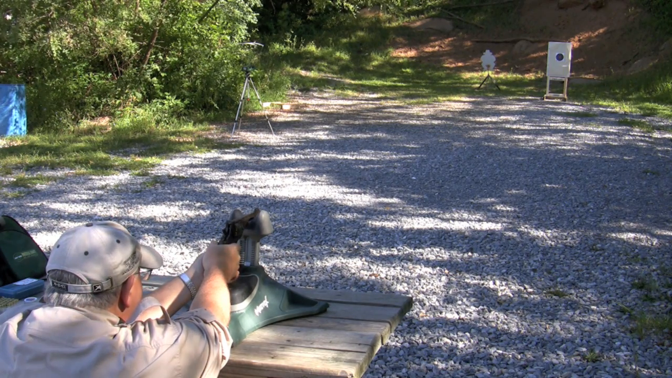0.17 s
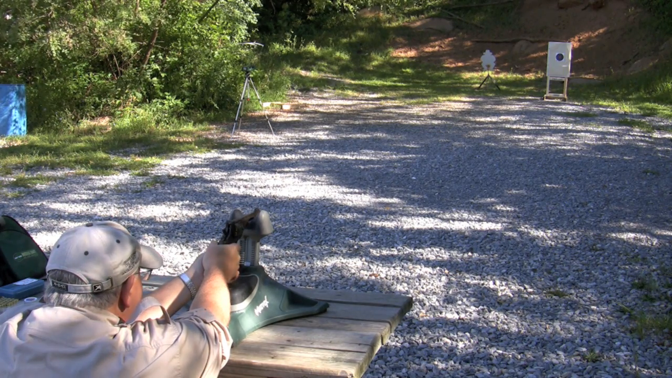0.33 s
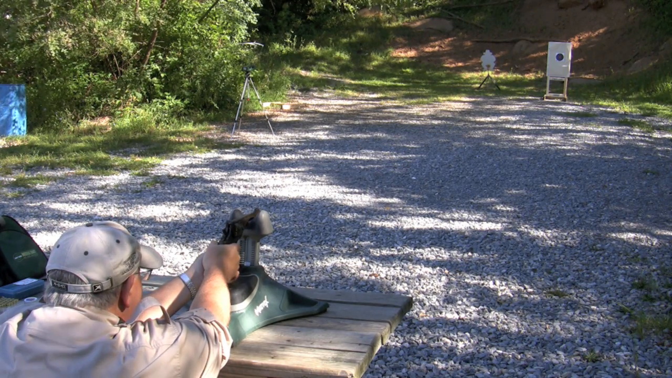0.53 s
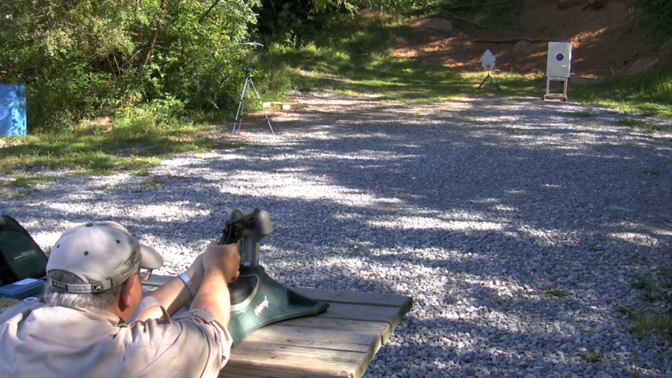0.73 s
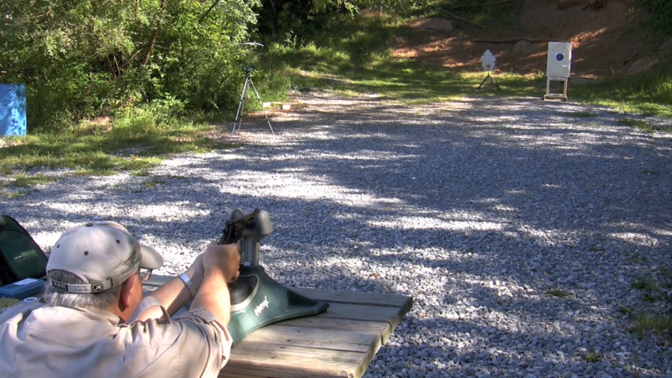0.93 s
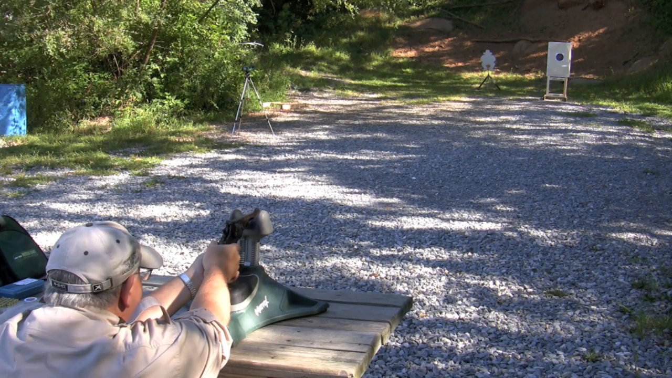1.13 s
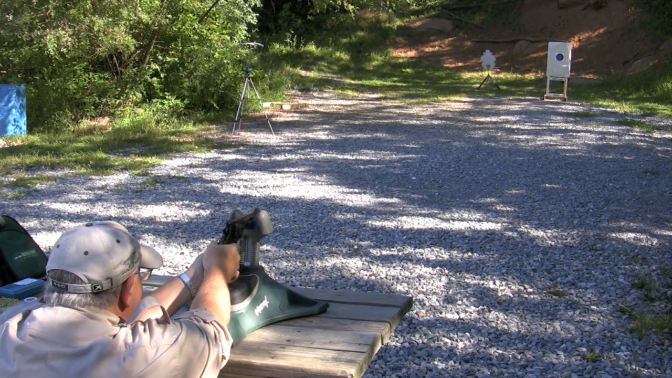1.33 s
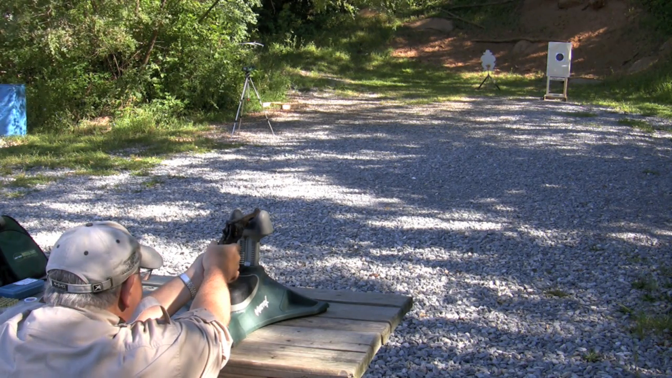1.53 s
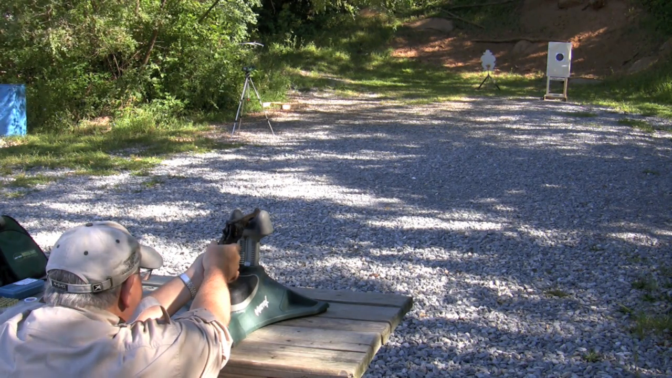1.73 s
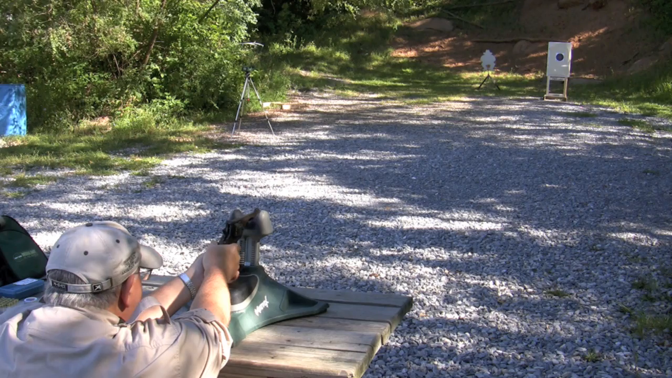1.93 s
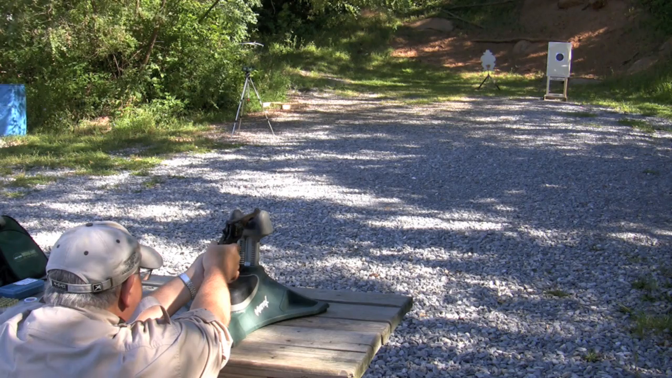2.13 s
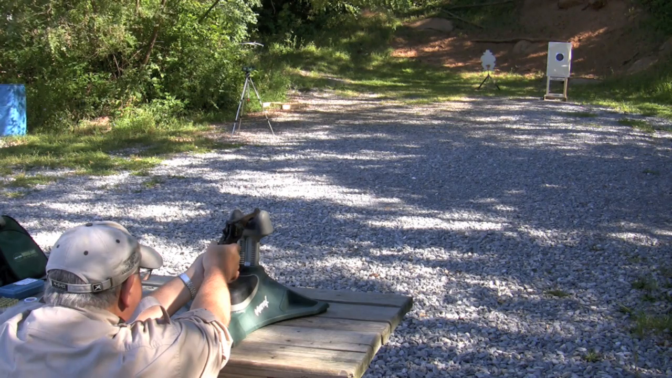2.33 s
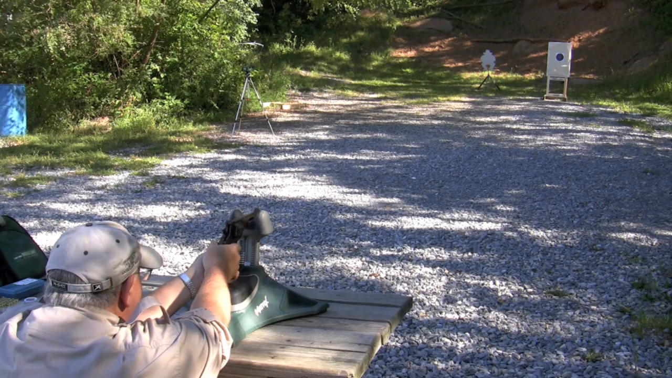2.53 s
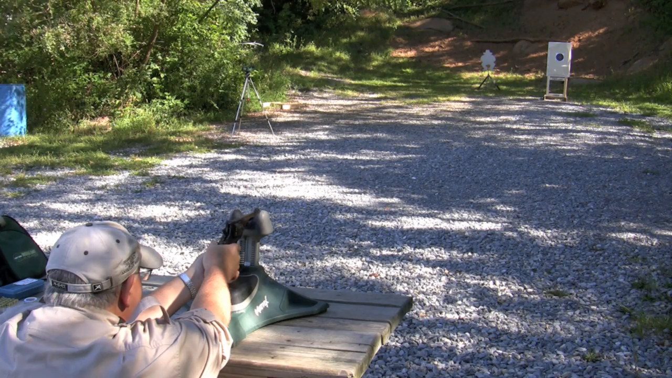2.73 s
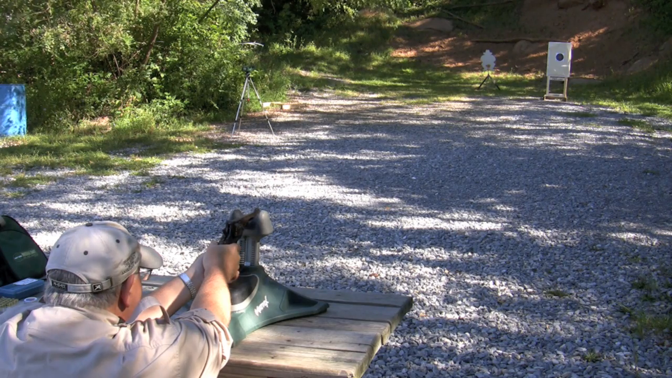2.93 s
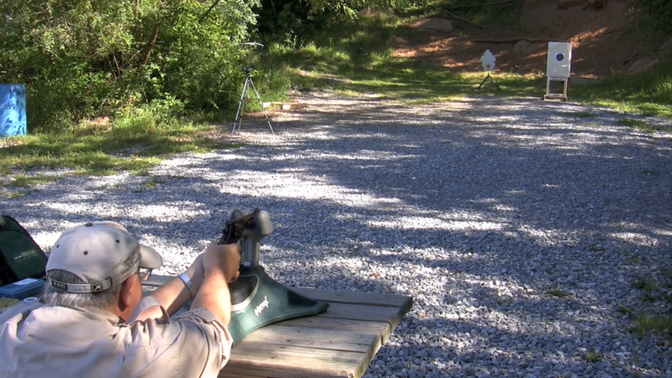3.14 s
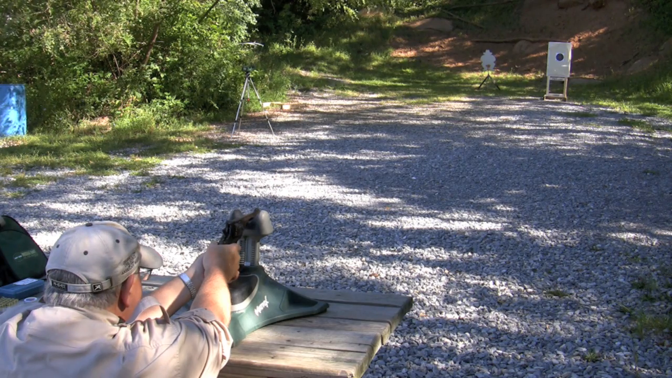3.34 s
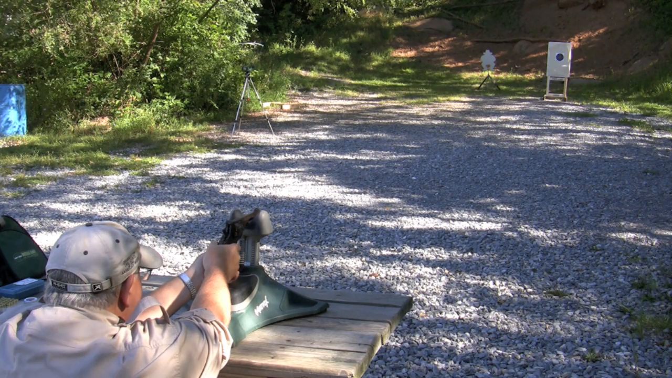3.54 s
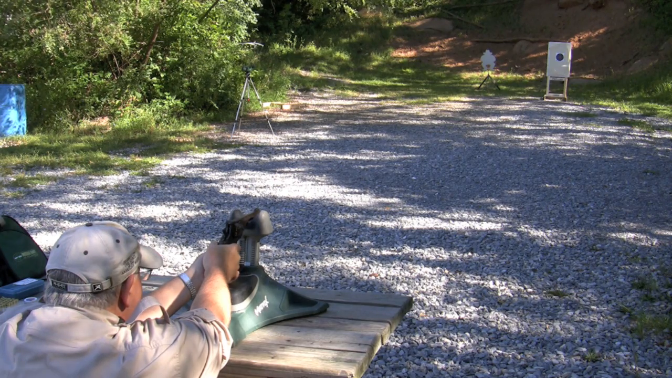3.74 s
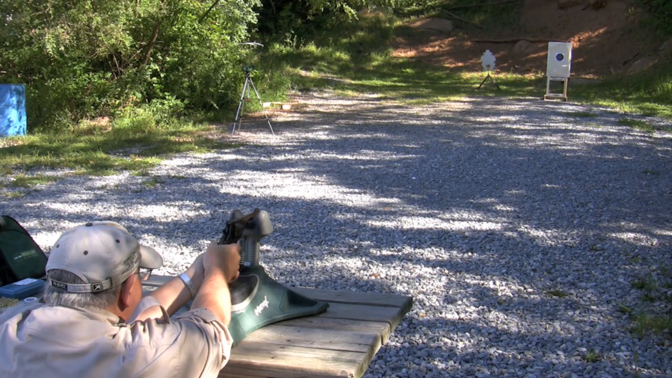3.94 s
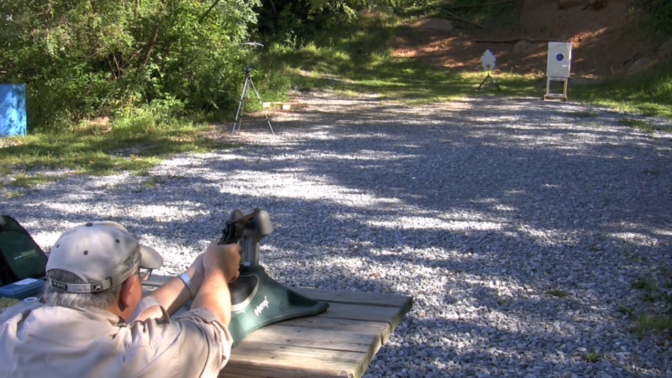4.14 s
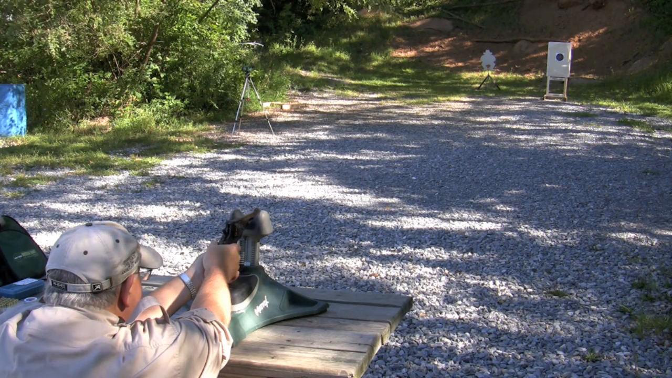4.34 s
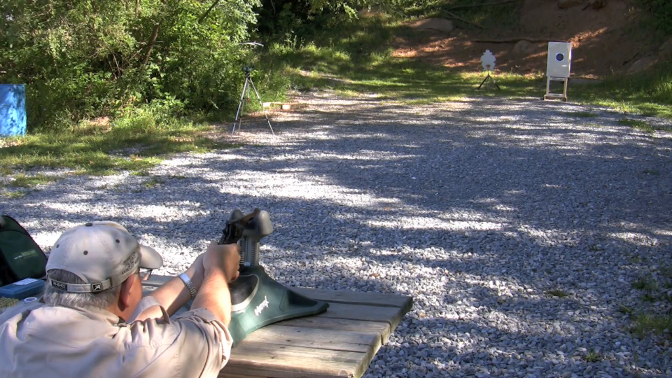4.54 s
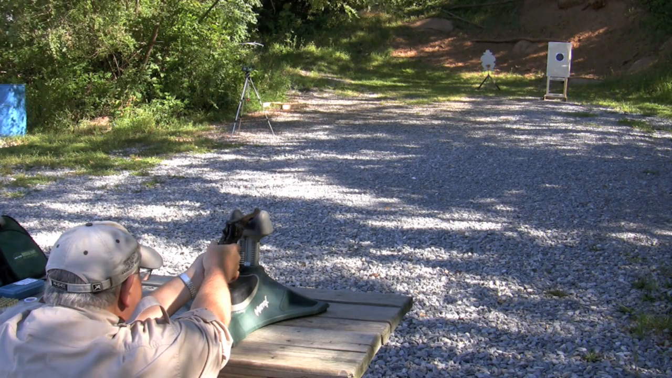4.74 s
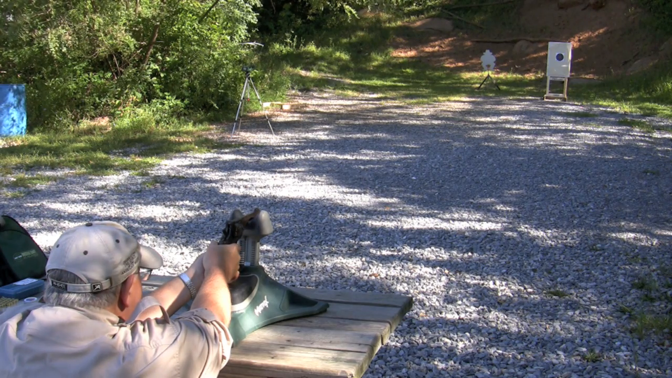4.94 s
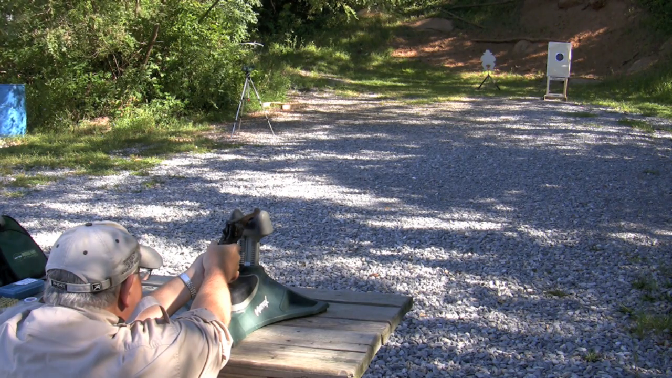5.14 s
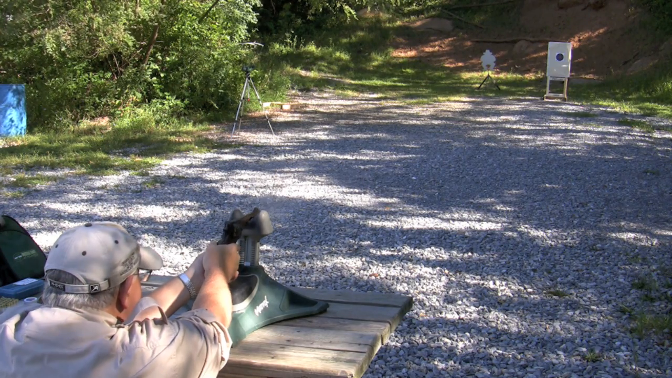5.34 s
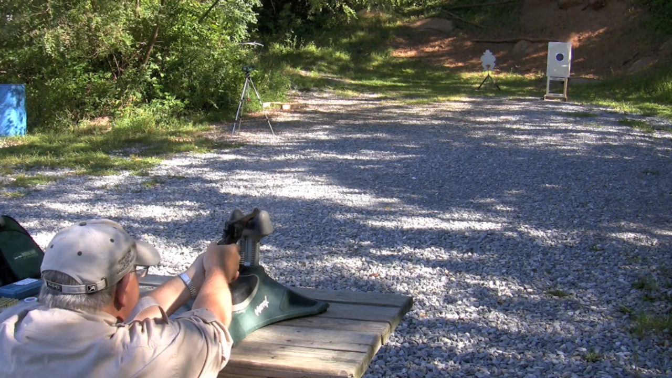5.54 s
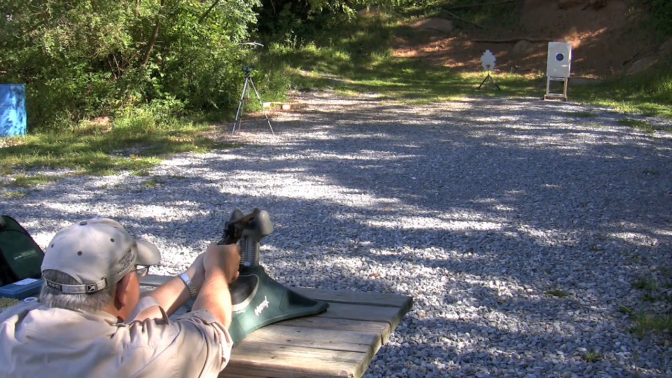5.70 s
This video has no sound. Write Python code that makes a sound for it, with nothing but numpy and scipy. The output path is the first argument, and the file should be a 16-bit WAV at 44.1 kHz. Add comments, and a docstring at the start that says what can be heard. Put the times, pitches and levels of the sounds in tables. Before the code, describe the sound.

Over five seconds of quiet summer crickets and bird trills, then a sudden clipped revolver blast, knocking echoes, and insects again.

```python
"""One revolver shot from a bench at a gravel range ringed by woods: pulses of shaped noise that clip the input.
Ringing knocks, noise washes and dull rolls return from gravel, bushes, earth banks and trees; brief noise
bursts make the hammer and settling ticks. Before and beneath it is a summer day: swept sine notes for a small
bird, pulsed sines for crickets, and bands of noise for the insect chorus, buzzers, traffic and a vehicle."""
import sys
import numpy as np
from scipy import signal
from scipy.fft import rfft, irfft
from scipy.io import wavfile

SR = 44100
rng = np.random.default_rng(int(sys.argv[2]) if len(sys.argv) > 2 else 0)


def to_wav(s):
    """Save 16-bit WAV."""
    ch = np.atleast_2d(s).T  # columns
    pcm = np.round(np.clip(ch, -1, 1) * 32767)  # PCM
    wavfile.write(sys.argv[1], SR, pcm.astype(np.int16))


N = 258867
TIME = np.arange(N) / SR
SHOT_S = 5.3364  # the blast arrives

# left-right likeness of the calm background: (frequency [Hz], likeness [0-1])
CALM_SAME = [(60, 0.8226), (290, 1), (640, 0.59), (1410, 0.2793), (3100, 0.6619), (6800, 0.7797),
             (15000, 1)]
# left-right likeness of the shot's returns: (frequency [Hz], likeness [0-1])
ECHO_SAME = [(60, 0.696), (200, 0.9539), (400, 0.93), (700, 0.75), (1400, 0.76), (2400, 0.6456),
             (4400, 0.891), (9000, 1)]


def gain_of(db):
    """Decibels to amplitude gain."""
    return 10 ** (np.asarray(db) / 20)


def evened(x):
    """Scales to rms 1."""
    return x / np.sqrt(np.mean(x ** 2) + 1e-20)


def decay(t, t60_s):
    """Exponential decay, 60 dB down after t60_s."""
    return np.exp(-np.log(1000) * t / t60_s)


def read(points, hz):
    """Reads a spectrum table on a log-frequency axis."""
    f, value = np.transpose(points)
    return np.interp(np.log(hz + 1), np.log(f + 1), value)


def add(mix, s, sound):
    """Mixes a sound in at time s, cut at the end of the mix."""
    part = mix[..., round(s * SR):][..., :sound.shape[-1]]
    part += sound[..., :part.shape[-1]]


def panned(pan_db):
    """Left and right gains for a left-minus-right level."""
    return gain_of([[pan_db / 2], [-pan_db / 2]])


def drift(rate_hz):
    """Random drift of rms 1: white noise cut off at rate_hz."""
    spectrum = rfft(rng.standard_normal(N))
    return evened(irfft(spectrum * (np.fft.rfftfreq(N, 1 / SR) < rate_hz), N))


def noise(colour_db, same):
    """Stereo noise of rms 1; colour_db maps Hz to dB, mid and side weights set the channels' likeness."""
    hz = np.fft.rfftfreq(N, 1 / SR)
    mid, side = rfft(rng.standard_normal((2, N))) * gain_of(colour_db(hz))
    likeness = np.clip(read(same, hz), 0, .999)
    mid = mid * np.sqrt(1 + likeness)
    side = side * np.sqrt(1 - likeness)
    return evened(irfft(np.array([mid + side, mid - side]), N))


def shaped(spectrum, same):
    """Stereo noise of rms 1 with a tabled spectrum."""
    return noise(lambda hz: read(spectrum, hz), same)


def beat(period_s, at_s, width_s):
    """A Gaussian swell once every period, width_s wide at -4.3 dB."""
    from_call_s = (TIME - at_s + period_s / 2) % period_s - period_s / 2
    return np.exp(-2 * (from_call_s / width_s) ** 2)


def whistle(pitch_hz, db):
    """One note along a pitch curve under a half-sine envelope."""
    envelope = np.sin(np.linspace(0, np.pi, len(pitch_hz)))
    return gain_of(db) * np.sqrt(2) * envelope * np.sin(2 * np.pi * np.cumsum(pitch_hz) / SR)


def foliage(song, wet_db, t60_s):
    """Adds the faint wash that leaves give a call: convolution with decaying stereo noise."""
    leaves = rng.standard_normal((2, SR // 2)) * decay(TIME[:SR // 2], t60_s)
    leaves = leaves / np.linalg.norm(leaves[0])
    wash = signal.fftconvolve(song[None], leaves, axes=1)[:, :N]
    return song + gain_of(wet_db) * wash


def background(air_db=-57.5, chorus_db=-42, rasp_db=-0.15, throb_db=.5, pan_db=0.36):
    """Far traffic, still air and a chorus of insects whose wing strokes roughen the chirr."""
    # far traffic: (frequency [Hz], relative density [dB per Hz])
    traffic_spectrum = [(15, -50), (25, -22), (75, -8), (113, 0), (130, 3.5), (162, -8), (214, 3),
                        (287, -11), (358, -5.5), (412, -17.5), (461, -13.5), (530, -23.5), (700, -31.5),
                        (910, -49), (1540, -120)]
    # swell of the traffic: (time [s], level [dB])
    traffic_swell = [(0, -47), (1.1, -43), (1.8, -45.5), (2.45, -44.5), (3.2, -46), (5.3, -46)]
    # still air: (frequency [Hz], relative density [dB per Hz])
    air_spectrum = [(300, -3), (600, 0.5), (1000, -2), (2000, -5), (3000, -7), (9000, -18.5),
                    (10500, -12.5), (15500, -22)]
    # insect chorus: (frequency [Hz], relative density [dB per Hz])
    chorus_spectrum = [(3000, -34.5), (3900, -24), (4400, -11), (4900, -6), (5250, -0.5), (5650, 0.5),
                       (6300, -3), (7000, -4), (7700, -10), (8100, -12.5), (8500, -24), (9000, -46.5)]
    rumble = gain_of(np.interp(TIME, *np.transpose(traffic_swell))) * shaped(traffic_spectrum, CALM_SAME)
    strokes = drift(450) + .5 * np.sin(2 * np.pi * 118 * TIME + drift(4))
    chorus_gain = gain_of(chorus_db + rasp_db * strokes + throb_db * drift(35))
    chorus = chorus_gain * shaped(chorus_spectrum, CALM_SAME)
    air = gain_of(air_db) * shaped(air_spectrum, CALM_SAME)
    return panned(pan_db) * (rumble + chorus + air)


def vehicle():
    """A far drone that swells and passes: one band of noise under a Gaussian envelope."""
    # drone: crest [s], half width at 1/e [s], centre [Hz], half width of band [Hz], level [dB]
    crest_s, half_s, centre_hz, width_hz, db = (0.8, 0.32, 344, 60, -51.5)
    drone = noise(lambda hz: -20 * np.log10(1 + ((hz - centre_hz) / width_hz) ** 4), CALM_SAME)
    return gain_of(db) * np.exp(-((TIME - crest_s) / half_s) ** 2) * drone


def buzzers():
    """Far insects on their own beats: each wing resonance is blurred by distance into a band of hiss."""
    # insects: (pitch [Hz], half width of band [Hz], period [s], time of one call [s], width [s], peak level [dB])
    insects = [(3571.1, 265.9, .379, 0.32, 0.19057, -62), (8060.6, 61, 0.67, .2, 0.72, -64.5)]
    out = np.zeros((2, N))
    for pitch_hz, width_hz, period_s, at_s, call_s, db in insects:
        wing = noise(lambda hz: -20 * np.log10(1 + ((hz - pitch_hz) / width_hz) ** 2), CALM_SAME)
        out += gain_of(db) * beat(period_s, at_s, call_s) * wing
    return out


def far_crickets(level_db=-53, low_hz=5100, high_hz=6400, period_s=.29, width_s=0.028, waver_hz=45, count=9):
    """Crickets in the grass, each sine with its own pitch, pace and place, make the chorus shimmer."""
    out = np.zeros((2, N))
    for pitch, pace, phase, place in rng.random((count, 4)):
        pitch_hz = low_hz + (high_hz - low_hz) * pitch ** 2 + waver_hz * drift(120.77)
        wing = np.sin(2 * np.pi * np.cumsum(pitch_hz) / SR)
        own_period_s = period_s * 2 ** ((pace - .5) / 2)
        out += panned(10 * (place - .5)) * beat(own_period_s, phase * own_period_s, width_s) * wing
    return gain_of(level_db) * np.sqrt(2) * out


def crickets(pulse_hz=60, pulse_depth=0.141, uneven_db=1.0, waver_hz=35):
    """Nearer crickets: nearly pure, finely pulsed chirps, each insect keeping its own time."""
    # insects: (pitch [Hz], period [s], time of one chirp [s], width [s], level [dB], left-minus-right [dB])
    insects = [(4785, .3205, .345, .045, -53, 1), (5215, .3002, .348, .045, -44.5, -1),
               (5635, .2625, .31, .045, -49, 1), (5245, .231, .22, .11, -53, 1)]
    out = np.zeros((2, N))
    for pitch_hz, period_s, at_s, chirp_s, db, pan_db in insects:
        wing = np.sqrt(2) * np.sin(2 * np.pi * np.cumsum(pitch_hz + waver_hz * drift(119)) / SR)
        pulses = 1 + pulse_depth * np.sin(2 * np.pi * pulse_hz * TIME + 2 * drift(6))
        level = gain_of(db + uneven_db * drift(2))
        out += panned(pan_db) * level * beat(period_s, at_s, chirp_s) * pulses * wing
    return out


def slow_cricket(pitch_hz=4213.2, gap_s=.054, syllable_s=.032, ends_db=-3, waver_hz=60, count=4):
    """Chirps of evenly spaced sine syllables on one wavering pitch, strongest in the middle."""
    # chirps: (centre of first syllable [s], level at the chirp's middle [dB])
    chirps = [(.033, -52), (0.714, -48.5), (1.515, -53), (2.276, -49.5), (2.99, -54), (3.66, -50.5),
              (4.366, -52), (5.028, -51.5)]
    song = np.zeros(N)
    pitch = pitch_hz + waver_hz * drift(250)
    for start_s, db in chirps:
        for k, place in enumerate(np.linspace(-1, 1, count)):
            s = max(start_s + k * gap_s - syllable_s / 2, 0)
            syllable_pitch = pitch[round(s * SR):][:round(syllable_s * SR)]
            add(song, s, whistle(syllable_pitch, db + ends_db * place ** 2))
    return foliage(song, wet_db=-9, t60_s=.18)


def bird(rise_s=.015, fall_s=.018, rise_hz=290, fall_hz=540, waver_hz=45, count=4):
    """Phrases of arched notes that get higher, louder and slower; each note ends in a steep downward slur."""
    # phrases: (apex of first note [s], gap before slowing [s], level the notes grow towards [dB])
    phrases = [(.640, 0.036, -43), (1.490, .0365, -41.5), (2.215, .0365, -43.5), (3.03, .037, -42),
               (4.690, .040, -42.5)]
    top_hz, first_flat_hz, first_soft_db = 4409.5, 190, -7
    warm_up = 0.37  # shortfall in pitch and level shrinks by this factor each note
    slowing_s = .0033  # each gap grows by twice this
    song = np.zeros(N)
    t = np.arange(-rise_s, fall_s, 1 / SR)
    arch_hz = np.where(t < 0, rise_hz * (t / rise_s) ** 2, fall_hz * (t / fall_s) ** 2)
    waver = waver_hz * drift(250)
    for start_s, gap_s, db in phrases:
        for k in range(count):
            s = start_s + k * gap_s + slowing_s * k ** 2
            shortfall = warm_up ** k
            pitch_hz = top_hz - first_flat_hz * shortfall - arch_hz + waver[round(s * SR):][:len(t)]
            add(song, s - rise_s, whistle(pitch_hz, db + first_soft_db * shortfall))
    return foliage(song, wet_db=-6.5, t60_s=.18)


def scatter(spectrum, lumpy_db, ring_db, clump_db=0.6, ring_hz=1620, ring_width_hz=240):
    """Wash of countless small reflections: clumpy noise with a resonant peak for the report's ring."""
    def colour_db(hz):
        return read(spectrum, hz) + ring_db / (1 + ((hz - ring_hz) / ring_width_hz) ** 2)
    uneven = gain_of(lumpy_db * drift(430) + clump_db * drift(70))
    return evened(noise(colour_db, ECHO_SAME) * uneven)


def woods(onset_s=0.0097, trunks_s=5.64, trunks_spread_s=0.01122, leaves_bass_db=-9, corner_hz=650):
    """The trees' echo swells and fades; the leafy edge returns little bass, the trunks behind it much."""
    # returns from the woods: (frequency [Hz], relative density [dB per Hz])
    woods_spectrum = [(60, -45), (160, -33.5), (300, -4.5), (400, -5.5), (650, -1.5), (980, -3), (1170, -7),
                      (1420, 0), (1750, -2), (2200, -4.5), (3500, -9), (5600, -15.5), (8600, -28.5),
                      (13000, -58)]
    first_s, crest_s, crest_db = 5.42, 5.765, -14.5
    rise_db_per_s, fall_db_per_s = 36, 40
    late_s = TIME - crest_s
    swell = gain_of(crest_db + np.minimum(rise_db_per_s * late_s, -fall_db_per_s * late_s))
    arrived = (TIME > SHOT_S) * (1 + np.tanh((TIME - first_s) / onset_s)) / 2
    wash = scatter(woods_spectrum, lumpy_db=1.0, ring_db=4.5, ring_width_hz=280)
    low = irfft(rfft(wash) / (1 + (np.fft.rfftfreq(N, 1 / SR) / corner_hz) ** 4), N)
    leafy = (1 - np.tanh((TIME - trunks_s) / trunks_spread_s)) / 2
    return arrived * swell * (wash + (gain_of(leaves_bass_db * leafy) - 1) * low)


def banks(centre_hz=340, skirt_db=5):
    """Broad earth banks smear the report into short, dull rolls of noise."""
    # rolls: (crest [s], half width at 1/e [s], level [dB])
    rolls = [(5.356, 0.01061, -22.5), (5.417, .014, -35), (5.444, .01, -26), (5.56, 0.014, -26)]
    roll = noise(lambda hz: -skirt_db * np.log2((hz + 1) / centre_hz) ** 2, ECHO_SAME)
    return roll * sum(gain_of(db) * np.exp(-((TIME - s) / half_s) ** 2) for s, half_s, db in rolls)


def clearing(onset_s=0.0034, edge_at_s=0.41, edge_s=0.0227):
    """Gravel and bushes answer at once, ever more weakly from farther away, up to the clearing's edge."""
    # returns from gravel and bushes: (frequency [Hz], relative density [dB per Hz])
    near_spectrum = [(40, -37.5), (100, -14), (220, -11.5), (380, -10.5), (600, -15), (800, -11),
                     (980, 0.5), (1190, -8), (1500, -0.5), (2700, 0.5), (3300, -3), (4400, -2.5),
                     (6300, -4), (11000, -19), (15500, -44)]
    ref_db, ref_age_s, fall_db = -15.5, .05, 14  # fall per tenfold age
    age_s = np.maximum(TIME - SHOT_S, 0)
    spreading = gain_of(ref_db - fall_db * np.log10((age_s + onset_s) / ref_age_s))
    inside = (age_s > 0) * (1 - np.tanh((age_s - edge_at_s) / edge_s)) / 2
    return spreading * inside * scatter(near_spectrum, lumpy_db=1.5, ring_db=2, clump_db=.7)


def echoes(thump_hz=260, thump_t60_s=0.026, rise_s=0.00044, low_cut_hz=130):
    """Berm and trunks return the report as separate ringing knocks, without the blast's deepest bass."""
    # knocks: (time [s], ring level [dB], bass thump relative to the ring [dB])
    knocks = [(5.3563, -24.5, -6), (5.3776, -28, -22), (5.4045, -10, -26), (5.4454, -2, -16),
              (5.4517, -19, -14), (5.496, -9.5, -34.5), (5.548, -11.5, -16), (5.573, -16.5, -4.5),
              (5.601, -11, -29), (5.636, -9, -29.5), (5.682, -16, -11), (5.8294, -9.5, -33)]
    # damped modes of a knock: (frequency [Hz], relative level [dB], t60 [s])
    modes = [(906, -8.5, 0.012895), (1570, -2, 0.01), (1739.1, -7.5, 0.00728), (4109, -5.5, .005)]
    out = np.zeros(N)
    t = TIME[:SR // 10]

    def ring(hz, t60_s):
        return np.sin(2 * np.pi * hz * t) * decay(t, t60_s) * (1 - np.exp(-t / rise_s))

    report = sum(gain_of(db) * ring(hz, t60_s) for hz, db, t60_s in modes)
    report = report / abs(report).max()
    thump = ring(thump_hz, thump_t60_s)
    for s, db, thump_db in knocks:
        add(out, s, -gain_of(db) * (report + gain_of(thump_db) * thump))
    return signal.sosfilt(signal.butter(2, low_cut_hz, "high", fs=SR, output="sos"), out)


def clicks(skirt_db=5):
    """Dry ticks of decaying noise: the hammer, then the gun recoiling and settling on its rest."""
    # ticks: (time [s], level at onset [dB], centre [Hz], t60 [s])
    ticks = [(5.329, -26, 3838, 0.028), (5.459, -20, 5200, 0.0073), (5.4962, -22.5, 4500, 0.00464),
             (5.5030, -10, 3770, 0.00313), (5.8366, -16, 12000, 0.003435), (5.8408, -18, 6000, 0.0036)]
    out = np.zeros((2, N))
    t = TIME[:SR // 20]
    for s, db, centre_hz, t60_s in ticks:
        burst = noise(lambda hz: -skirt_db * np.log2((hz + 1) / centre_hz) ** 2, ECHO_SAME)[:, :len(t)]
        add(out, s, gain_of(db) * burst * decay(t, t60_s))
    return out


def blast(boom_db=24, boom_s=0.004999, push_db=-9.0, push_hz=70, crack_db=-1, crack_at_s=0.007,
          crack_width_s=0.0034, spray_db=-14, spray_t60_s=0.24486, front_s=0.001218):
    """Muzzle pressure wave with ragged boom, crack thrown back by the bench and bright spray off the ground."""
    # heavy boom: (frequency [Hz], relative density [dB per Hz])
    boom_spectrum = [(20, -10), (140, -13), (260, 0), (550, -7), (750, 1), (1000, -1), (1500, 1),
                     (2600, -4), (6000, -11), (15000, -31)]
    # bright crack and spray: (frequency [Hz], relative density [dB per Hz])
    crack_spectrum = [(100, -3), (500, -0.5), (1500, 1), (4000, -1), (7000, 1), (11000, -3), (15500, -12)]
    # left-right likeness: (frequency [Hz], likeness [0-1])
    blast_same = [(60, 0.834), (300, 0.93), (1000, 1), (3000, 0.923), (9000, 1)]
    age_s = np.maximum(TIME - SHOT_S, 0)
    front = 1 - np.exp(-(age_s / front_s) ** 2)
    push = -gain_of(push_db) * np.sin(2 * np.pi * push_hz * age_s)  # slow pressure swing, relative to the boom
    boom = gain_of(boom_db) * np.exp(-(age_s / boom_s) ** 2) * (push + shaped(boom_spectrum, blast_same))
    crack = gain_of(crack_db) * np.exp(-((age_s - crack_at_s) / crack_width_s) ** 2)
    spray = gain_of(spray_db) * decay(age_s, spray_t60_s)
    return front * (boom + (crack + spray) * shaped(crack_spectrum, blast_same))


def scene():
    """The range: steady summer background, then the shot and its echoes."""
    summer = background() + vehicle() + buzzers() + far_crickets() + crickets() + slow_cricket() + bird()
    returns = woods() + banks() + clearing() + echoes()
    return summer + returns + clicks() + blast()


def record(dry, ceiling=.95, edge_hz=15750):
    """The overloaded microphone input flattens peaks towards the ceiling; a low-pass limits the band."""
    clipped = dry / (1 + (dry / ceiling) ** 8) ** (1 / 8)
    low_pass = signal.firwin(255, edge_hz, window=("kaiser", 8), fs=SR)
    return signal.oaconvolve(clipped, low_pass[None], "same")


dry = scene()
out = record(dry)
to_wav(out)
```